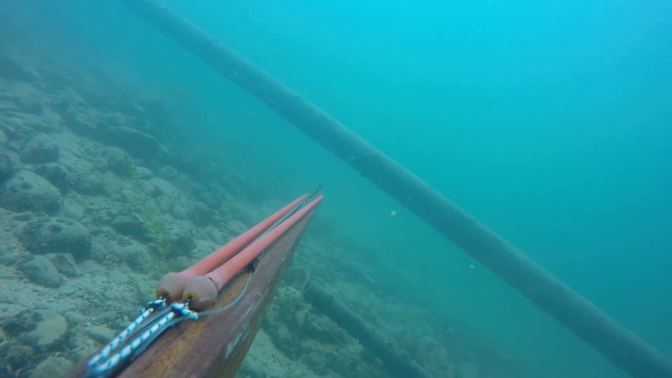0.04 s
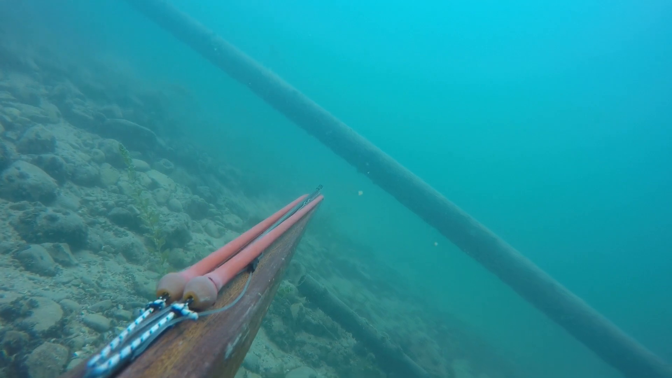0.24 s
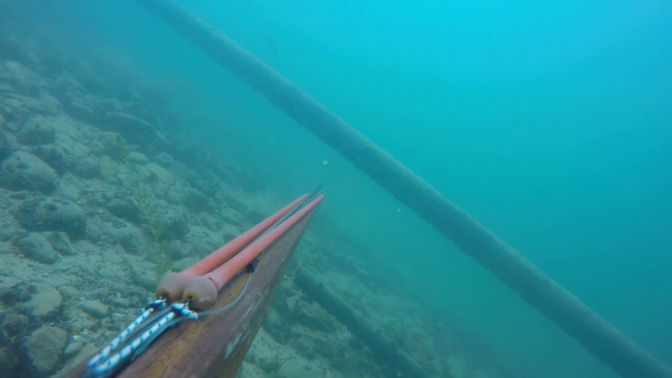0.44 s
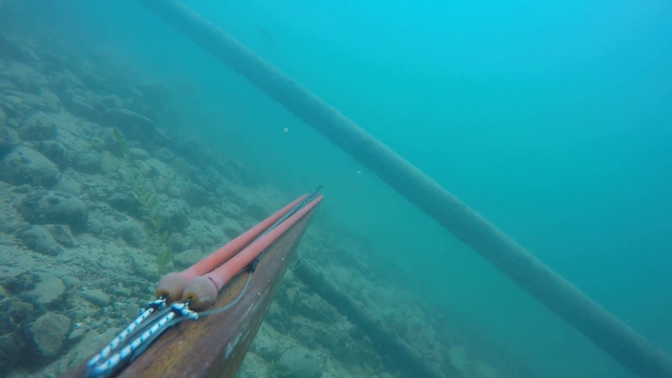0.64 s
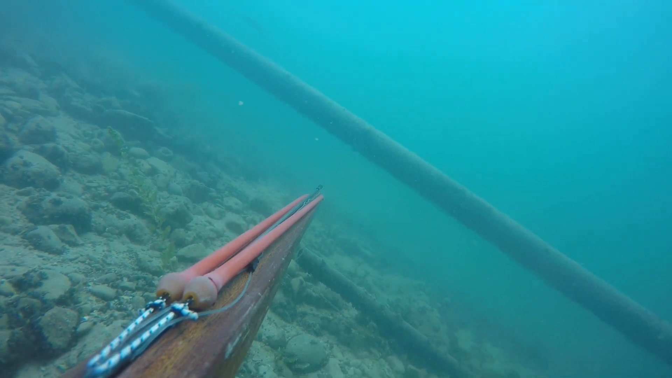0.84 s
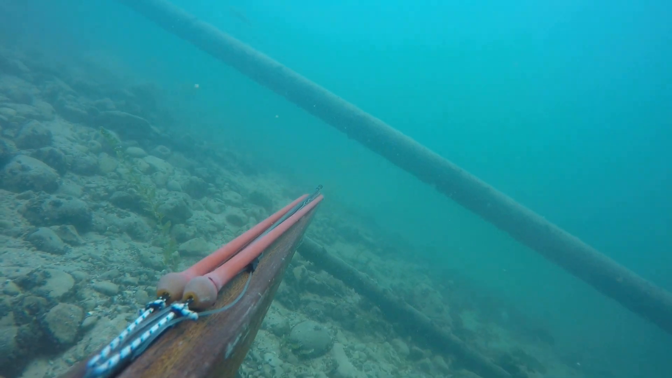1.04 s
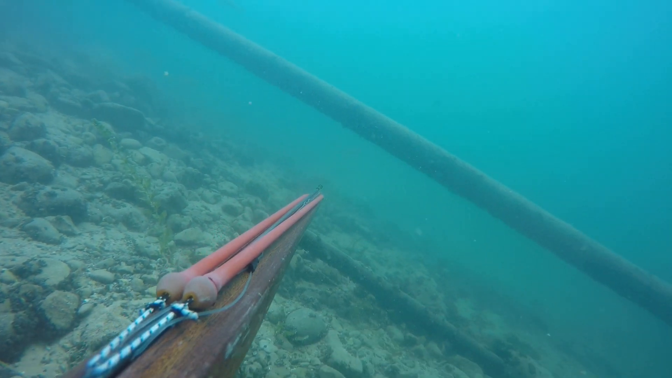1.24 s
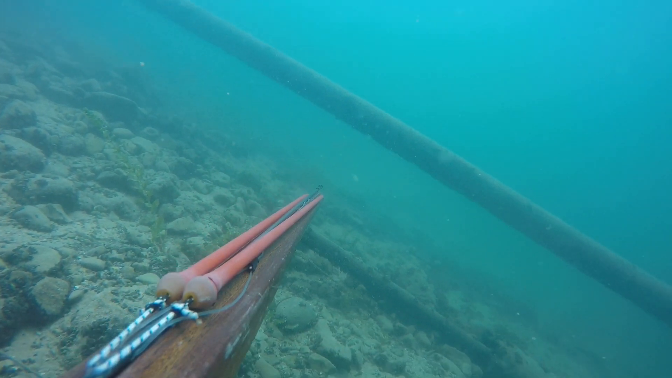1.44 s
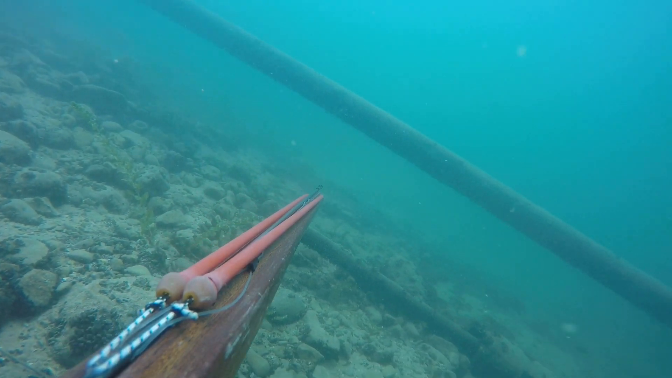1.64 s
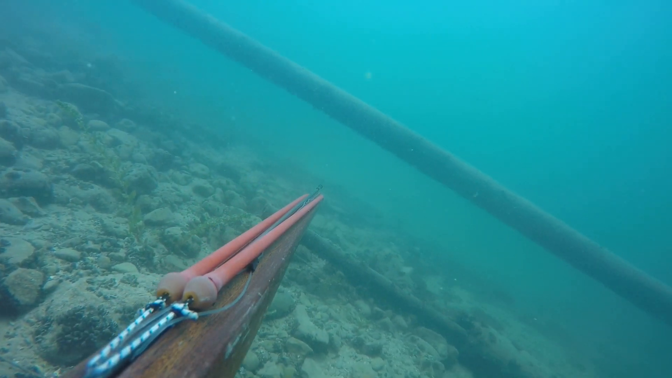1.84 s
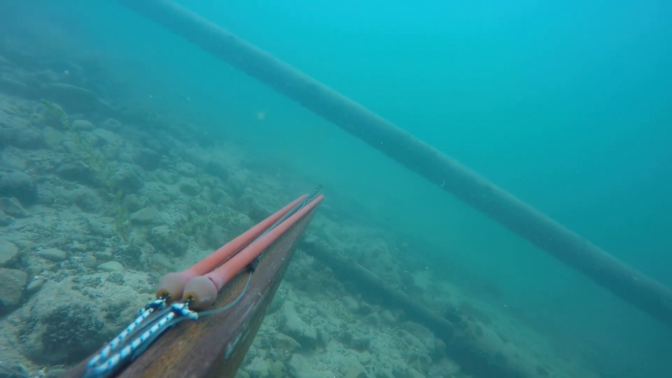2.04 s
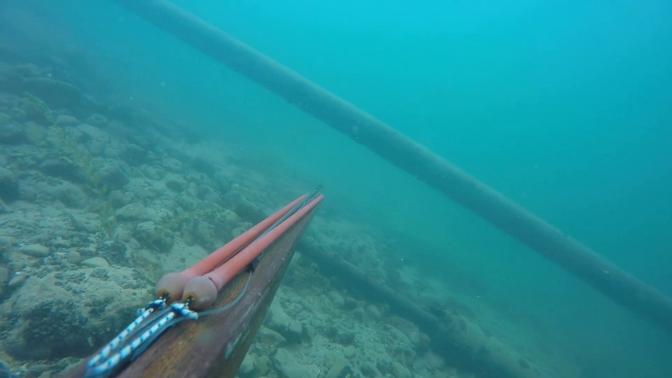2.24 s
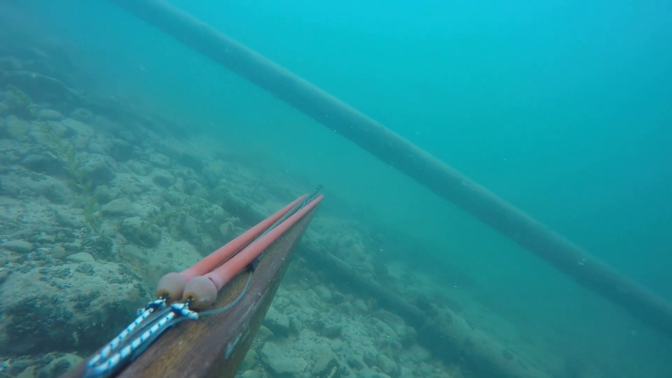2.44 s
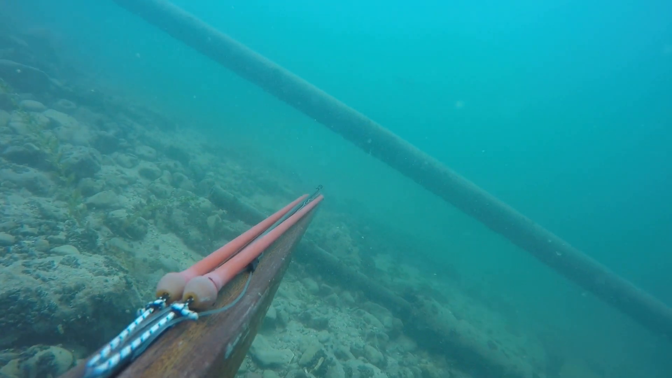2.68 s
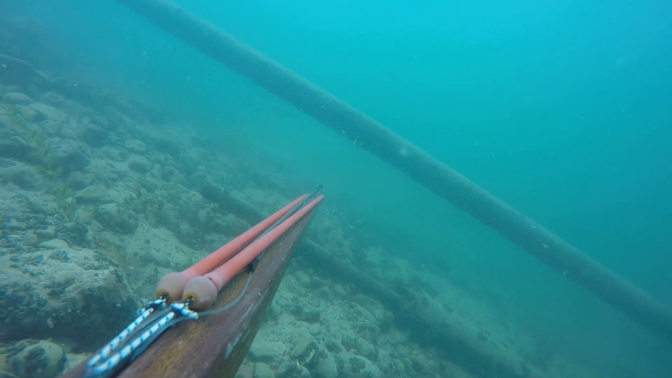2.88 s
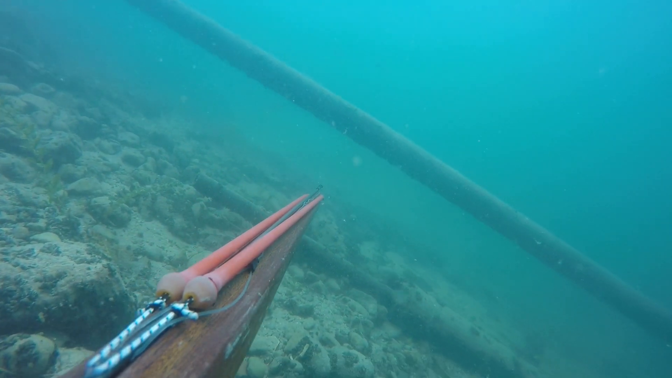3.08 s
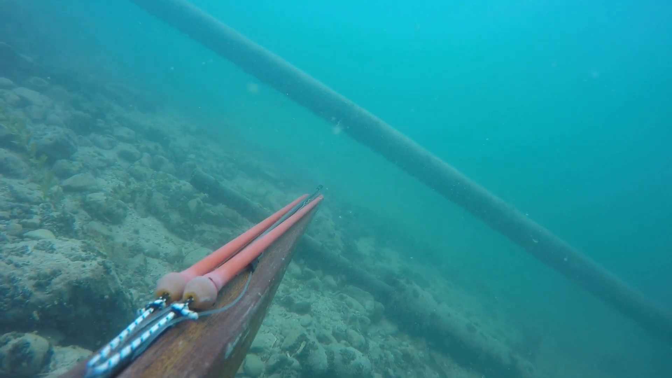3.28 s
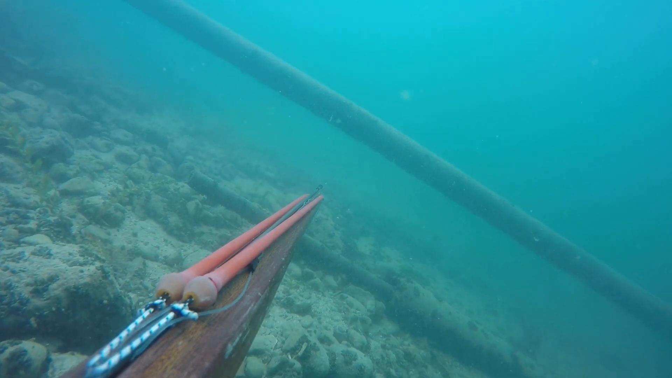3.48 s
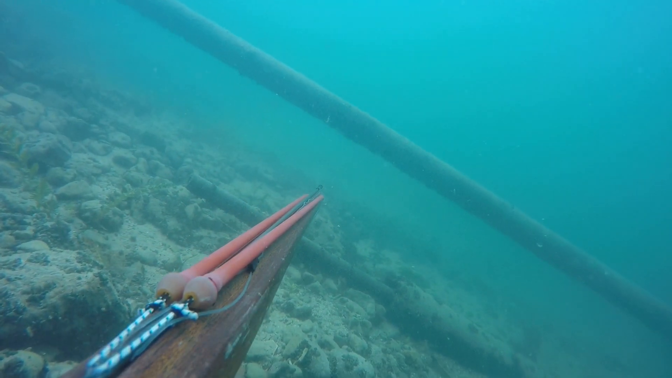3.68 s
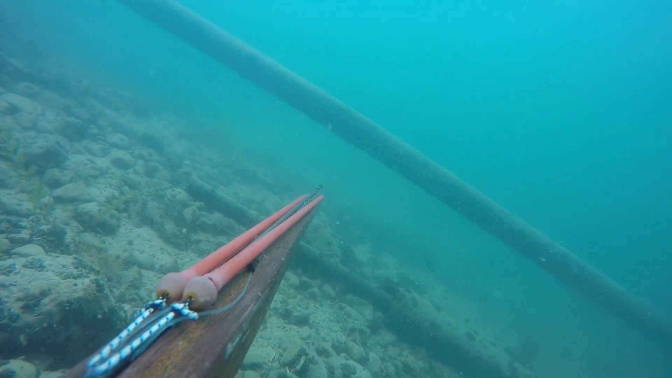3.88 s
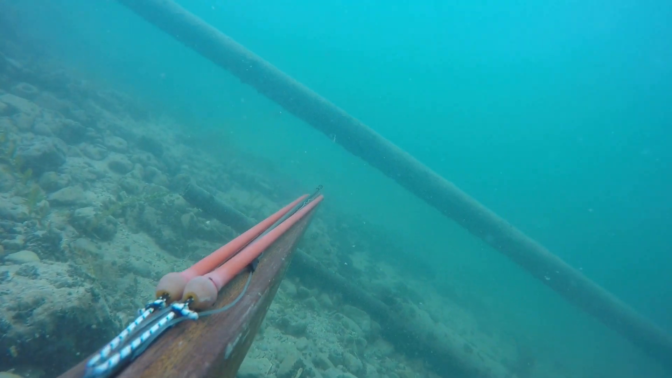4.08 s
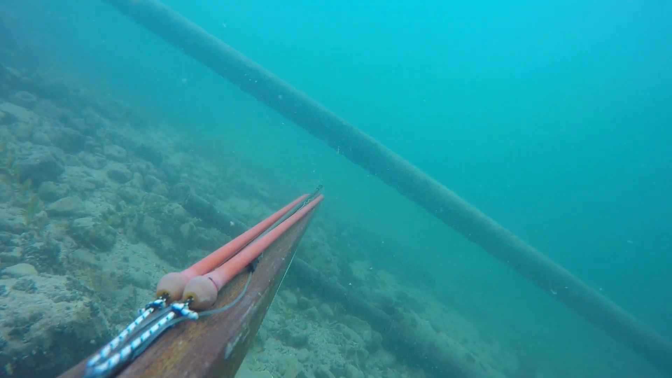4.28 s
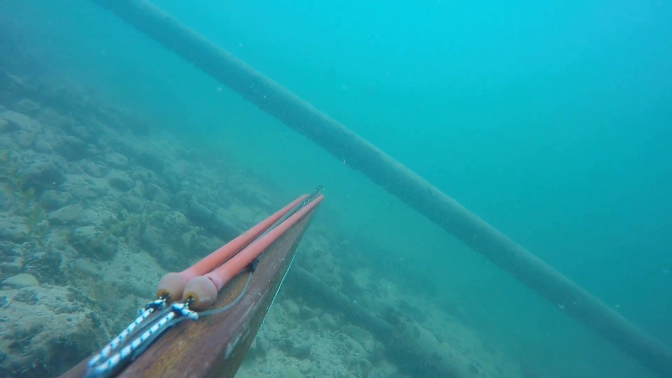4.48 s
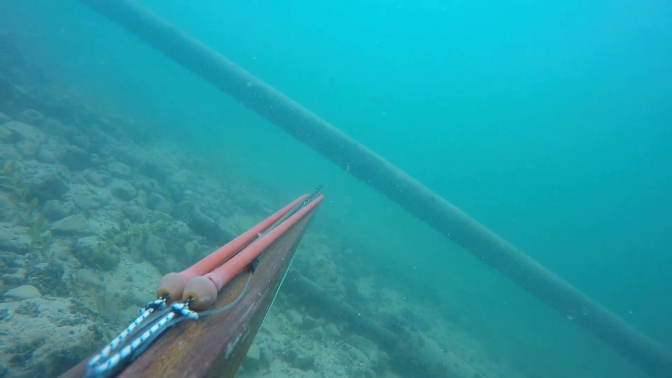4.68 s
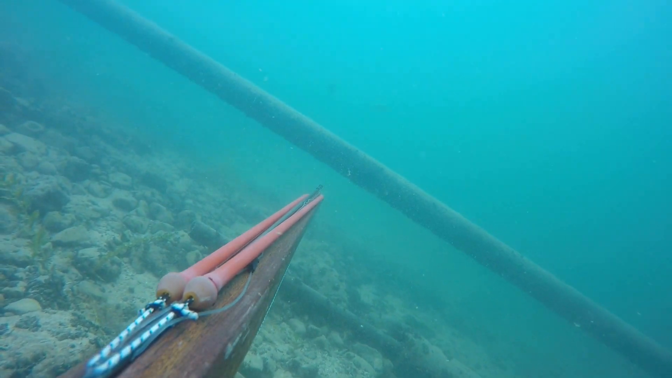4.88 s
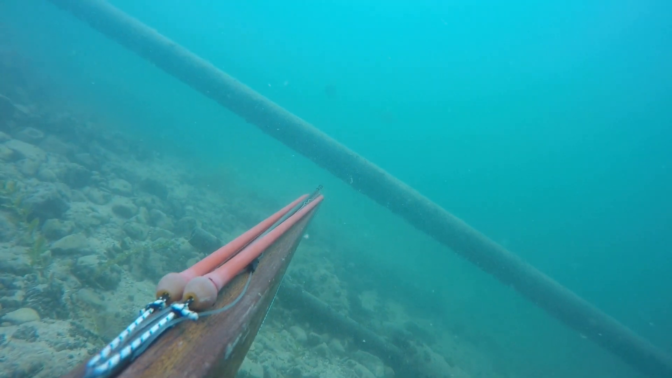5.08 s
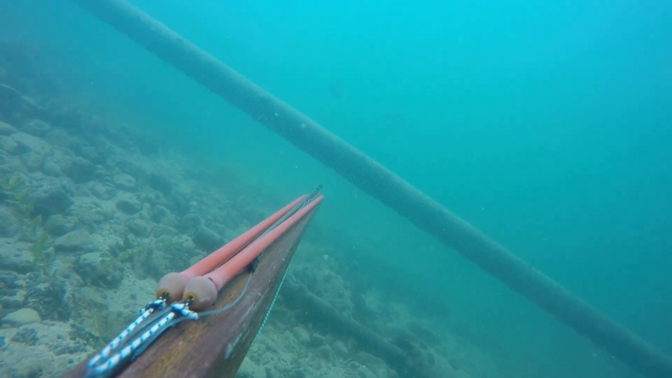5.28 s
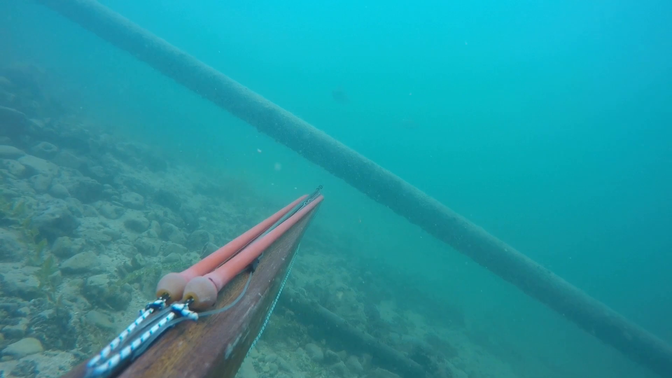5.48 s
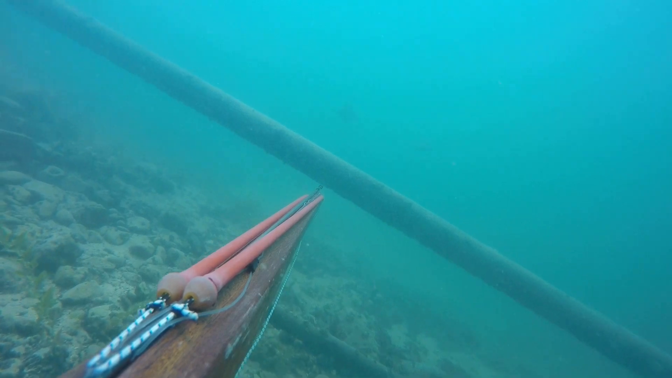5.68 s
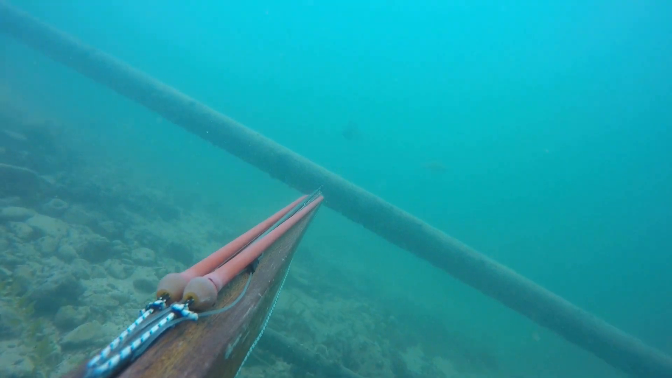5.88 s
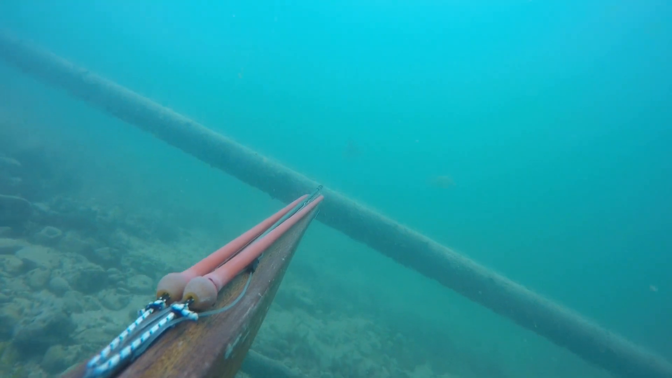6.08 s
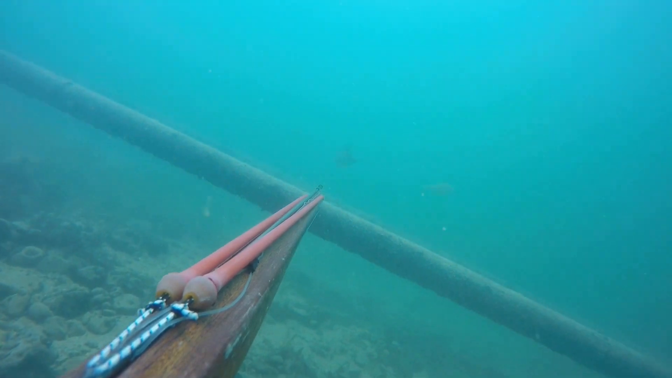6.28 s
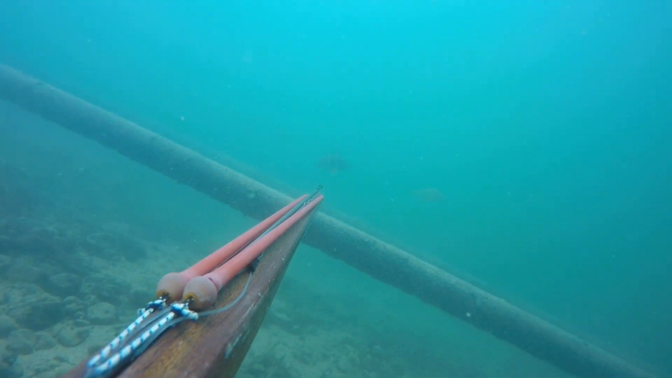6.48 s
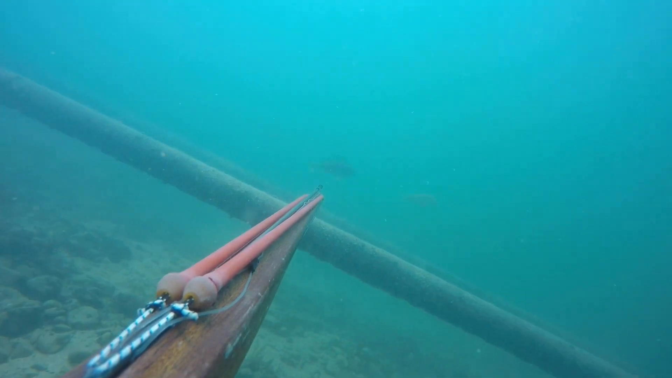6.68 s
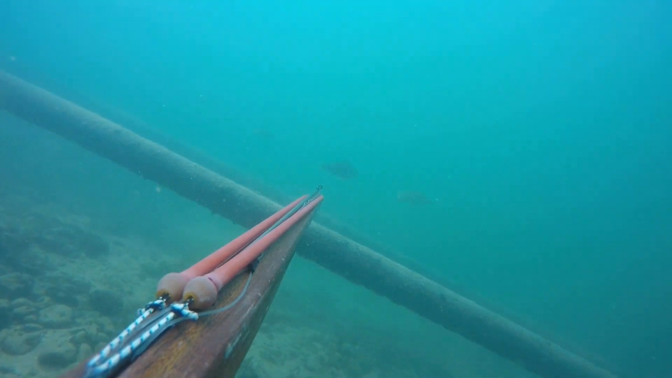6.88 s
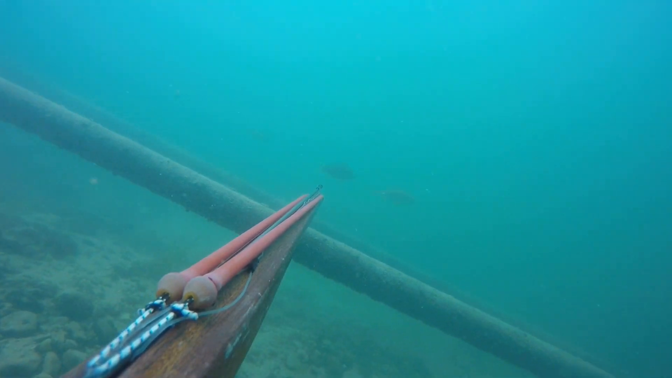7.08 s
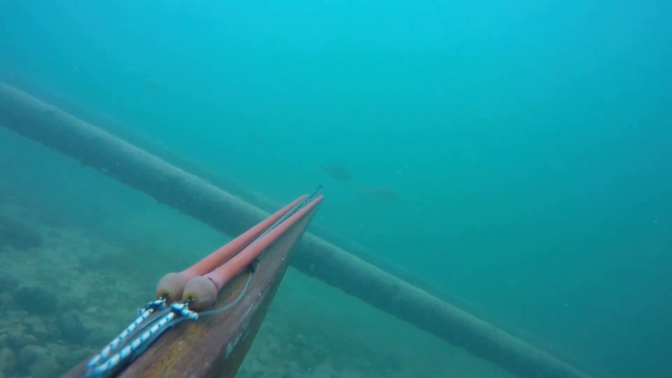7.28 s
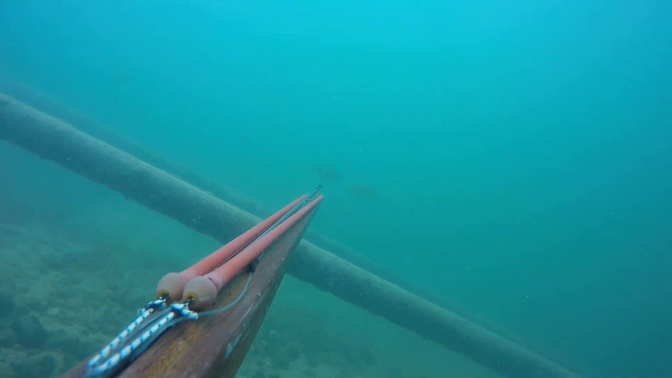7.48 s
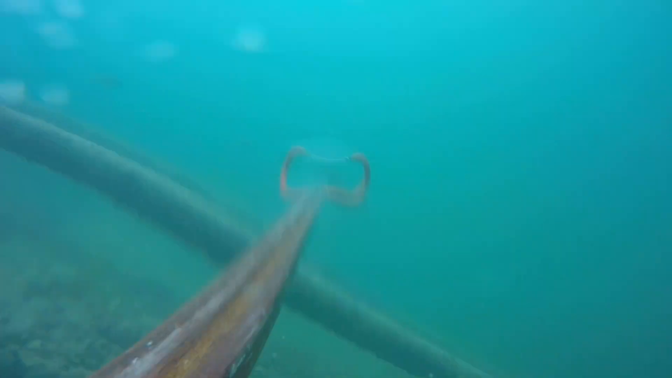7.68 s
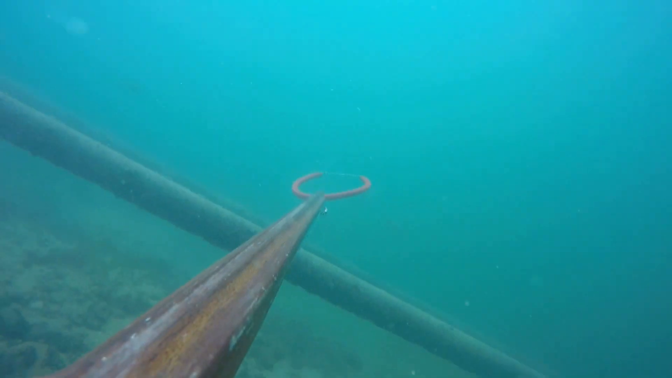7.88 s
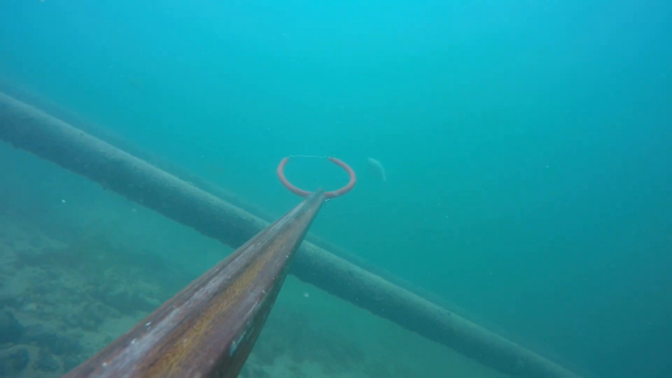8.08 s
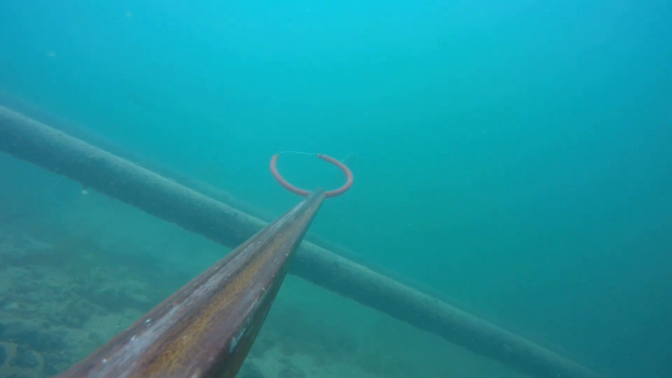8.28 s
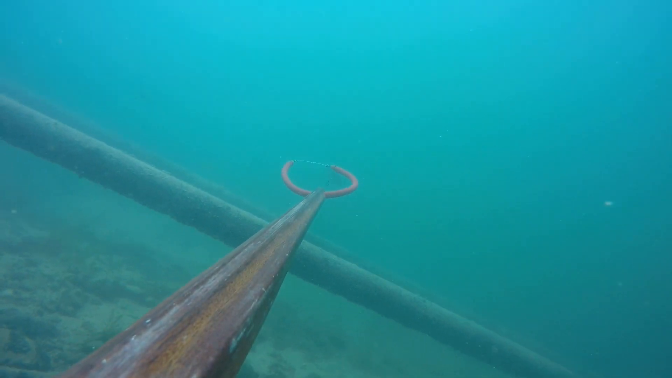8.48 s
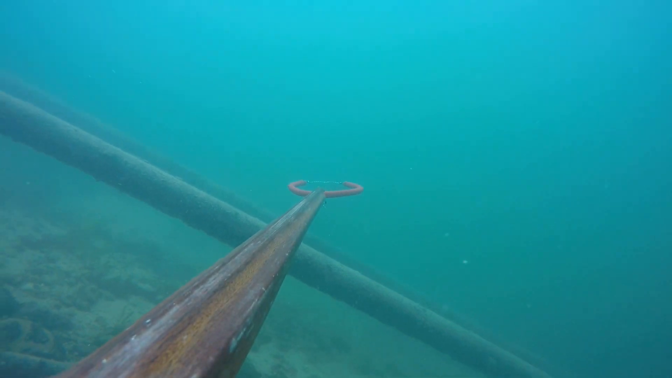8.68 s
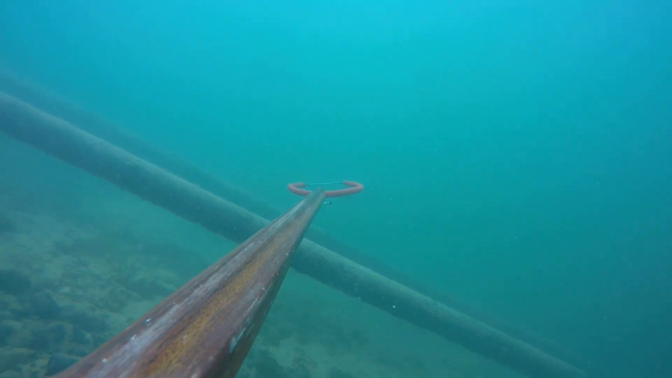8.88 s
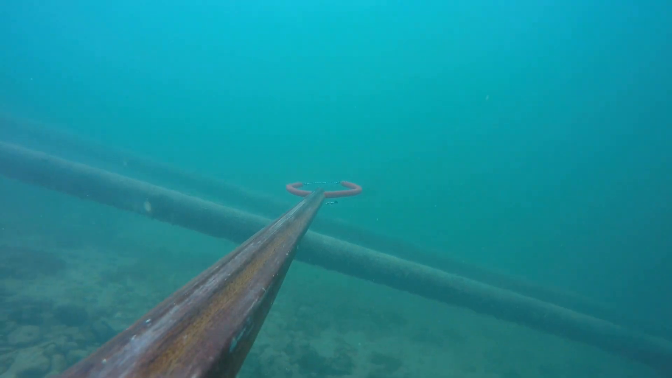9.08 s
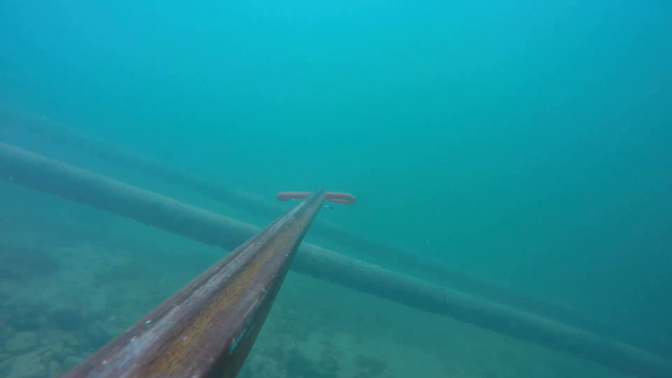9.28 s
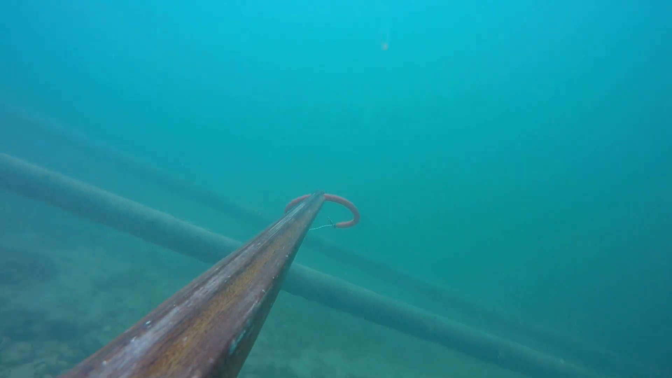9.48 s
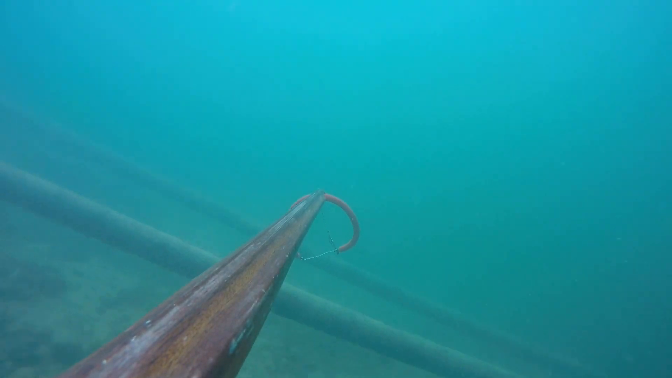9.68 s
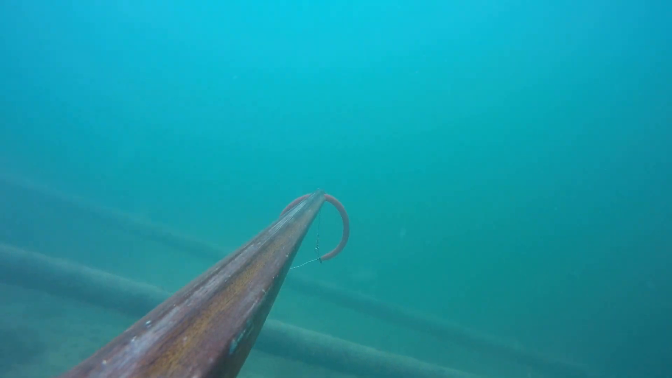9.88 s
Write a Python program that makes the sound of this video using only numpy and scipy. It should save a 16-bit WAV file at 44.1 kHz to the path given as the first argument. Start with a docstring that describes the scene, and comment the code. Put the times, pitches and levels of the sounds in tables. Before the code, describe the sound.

Quiet washing water with a thin faint whine, a sudden overloaded speargun shot, a brief hush, then irregular rubbery knocks and scrapes.

```python
"""A band-powered speargun is carried through a lake and fired, heard from a watertight housing fixed to its stock.
Water wash, a muffled hiss with narrow resonances and a thin whine lie over the mount's very low sway; dull bumps,
stirred water and a few high squeaks come before the shot. The shot, bursts of force into steel and barrel modes plus
a kick, overloads the microphone; the shaft scrapes off its rail, damped sines ring hollow, a faint high hiss holds
and fades, and the background sinks and creeps back. Line and slack bands then rub and knock in irregular stick-slip
bursts, and late on the line drags."""
import sys
import numpy as np
from scipy import signal
from scipy.fft import rfft, irfft, next_fast_len
from scipy.io import wavfile

SR = 44100
rng = np.random.default_rng(int(sys.argv[2]) if len(sys.argv) > 2 else 0)


def bounce(signal):
    """Save signal as a 16-bit WAV file at the path given by the first command-line argument."""
    frames = np.transpose(np.atleast_2d(signal))
    limited = np.clip(frames, -1, 1)
    pcm = np.round(limited * 32767).astype(np.int16)
    wavfile.write(sys.argv[1], SR, pcm)


N = 438354

# wash along the housing: (time [s], level [dB])
FLOW = [(0.0, -53), (0.38, -54), (2.23, -54.5), (7.5, -47)]
# relative noise spectra, each scaled to rms 1 in use: (frequency [Hz], density [dB per Hz])
WASH_SPECTRUM = [(100, -46), (170, -17.5), (210, -12.5), (306, -8), (386, -10), (437, -10), (642, 1),
                 (883, -9), (1110, -22), (1340, -20), (1530, -21.5), (1700, -14), (2210, -47), (3740, -120)]
GURGLE_SPECTRUM = [(35, -7.5), (55, 2), (75, -1.5), (100, -7.5), (135, -1.5), (155, -4.5), (185, -29),
                   (300, -32.5)]
HISS_SPECTRUM = [(820, -38), (1400, -20.5), (1550, -34), (1850, 2), (2500, 0), (3050, 0.5), (3400, -3.5),
                 (3690, -2), (4450, -8), (6070, -10), (6640, -16), (7340, -15), (8520, -19.5),
                 (13900, -25.5), (15200, -38)]
EDDY_SPECTRUM = [(20, -7), (35, 3), (50, -14), (70, -27.5), (110, -45.5), (200, -60)]
AFTER_HISS_SPECTRUM = [(4000, -0.5), (9000, -2.5), (15000, -9.5)]
# housing resonances singing in the hiss: (frequency [Hz], width [Hz], mean level [dB])
WHISTLES = [(443.7, 10, -70.5), (1943, 12, -71), (2325, 36, -65.5), (3043, 73, -63.5), (4093, 88, -71),
            (6000, 180, -80.5), (6140, 50, -78.5), (13700, 900, -81)]
HISS_SLOW_WATER_DB, HISS_SHARE_OF_WASH_RISE = -54.5, 0.18
GURGLE_DB, WATER_LULL_SHARE = -56, 0.94   # the water sinks less deeply than the hiss
# background level after the shot: (start [s], fall [s], depth [dB], hold [s], recovery [dB per s])
LULL = (7.706, 0.18, 20.56, 0.49, 14)

# sway while aiming and after the shot: (time [s], level [dB])
AIM_SWAY = [(4.6, -35.5), (4.8, -41), (5.15, -18.5), (5.77, -22.5), (5.81, -29.5), (6.19, -19.5),
            (6.37, -28), (6.67, -15), (7.17, -16.5), (7.23, -26), (7.55, -18.5)]
AFTER_SWAY = [(7.9, -33.5), (8.43, -41.5), (8.92, -34.5), (8.96, -22), (9.55, -23), (9.73, -32),
              (9.94, -17)]
# small pushes while stalking: (time of top [s], half length to 1/e [s], level [dB])
NUDGES = [(1.45, 0.21, -37), (4.2, 0.079, -34.5)]
SWAY_MEAN_HZ, STALK_DB = 23.0, -42.5   # STALK_DB: sway while gliding along

# swells of the whine: (time of top [s], half length to 1/e [s], level [dB])
WHINE_SWELLS = [(1.196, 0.062, -60.5), (3.87, 0.053, -61), (5.696, 0.38, -69), (8.95, .5, -52)]
# whine overtones: (multiple of the whine's pitch [1], mean level [dB])
OVERTONES = [(1.5, -67), (2, -66), (3, -76), (4, -79)]
WHINE_MEAN_HZ, WHINE_MEAN_DB, WHINE_WANDER_DB = 1793, -69.5, 3

# dull bumps, gulps of water, thump of the shot: (time [s], frequency [Hz], level before envelope [dB])
BUMPS = [(.079, 430, -26.5), (.162, 450, -32), (.212, 242, -34), (.485, 100, -28), (.652, 34, -21),
         (5.181, 80, -17), (5.238, 230, -22.5), (7.605, 151.3, 7), (8.695, 340.5, -36), (8.969, 217, -26),
         (9.428, 59.5, -10), (9.742, 85, -12.5)]
# gun turned, stirring the water: (time of top [s], half length to 1/e [s], level [dB])
STIRS = [(.15, .35, -52), (5.2, 0.098, -45.5), (8.05, .15, -61), (9.58, 0.25, -42.5)]
# short high squeaks: (time [s], level before envelope [dB])
SQUEAKS = [(3.462, -58), (3.490, -52), (5.352, -50)]
# hollow rings after the shot (low gulps, a clack's ping, knocks on the stock):
# (time [s], frequency [Hz], level before envelope [dB])
HOLLOW_RINGS = [(7.648, 301, -18.5), (7.657, 236, -16), (7.7228, 2660, -10), (7.725, 570, -21),
                (7.730, 380, -29.5), (8.0155, 752, -21), (8.042, 785, -28), (8.071, 757, -32),
                (8.117, 757, -35)]
BUMP_CYCLES, SQUEAK_CYCLES, RING_CYCLES = 5.4, 290, 26.8   # swings to decay 60 dB
SQUEAK_HZ = 11150

# steel on steel, trigger to the shaft's last clack:
# (time [s], length [s], steel ring [dB], crack [dB], crack top [Hz], barrel [dB])
SHOT_CONTACTS = [(7.581, 0.0043, -34, -62, 1520, -32), (7.602, 0.0026, -33, -33, 3000, -19.5),
                 (7.6075, 0.0027, -4.5, -8, 3404, -7.5), (7.615, 0.00074, -7, -10, 5000, -23),
                 (7.636, 0.0052, -17, -24.5, 2500, -26.5), (7.664, 0.0041, -26, -39, 2500, -28.5),
                 (7.7115, .0021, -26, -37, 7000, -42), (7.724, 0.0012, -26, -27, 3000, -34),
                 (7.8276, 0.005, -29, -29.5, 4500, -43)]
# the shaft's steel ring, bare scrape and barrel drone: (level [dB], hold [s], fade [dB per s])
SLIDE_PARTS = [(-24, .02, 299), (-29, 0.014, 299), (-20, 0.034, 401)]
# modes: (frequency [Hz], relative level before chance [dB], t60 [s])
BARREL_MODES = [(320, -8, .04), (485.5, -1, .02), (672, 0, .022), (875, -5.5, 0.029), (1090, -15.5, 0.023),
                (1355, -2.5, .025), (1500, -10, 0.019)]
STEEL_MODES = [(1950, -1.5, 0.015), (2300, 1.5, 0.0098), (2490, 1, 0.0087), (3060, -4, 0.008),
               (3245, -3.5, 0.0088), (4100, -12, 0.015), (5030, -9.5, 0.0044), (6000, -7, 0.0064)]
STOCK_MODES = [(232, -14.5, 0.049), (328, -15.5, 0.04), (449, -12, 0.075), (644, 0.5, 0.035),
               (788, 0, 0.062), (1056, -15.5, 0.058)]
FITTING_MODES = [(1514, -3.5, 0.011), (1770, -6.5, 0.023), (2240, 2.5, 0.02), (2740, -7.5, 0.031),
                 (2840, -8.5, 0.019), (3270, -3, 0.0065), (3580, 7, 0.0098), (3950, 6.5, 0.0048),
                 (4544, -7, 0.015)]
FIRE_S, SLIDE_START_S = 7.602, 7.622
AFTER_HISS_DB, AFTER_HISS_HOLD_S, AFTER_HISS_FADE_DB_PER_S = -74.5, 0.59, 150

# line and bands rubbing and knocking: (time [s], length [s], fittings [dB], stock [dB])
RUBS = [(7.983, 0.015, -49.5, -46), (8.01, 0.0031, -31, -36), (8.045, 0.013, -57, -38),
        (8.068, 0.0057, -42.5, -37), (8.076, 0.019, -46, -38), (8.098, .026, -45.5, -41.5),
        (8.182, 0.012, -63, -59), (8.538, .008, -62.5, -58), (8.97, 0.0076, -62.5, -45),
        (9.22, 0.041, -43.5, -44), (9.3724, 0.0072, -23, -29), (9.408, 0.034, -32, -28.5),
        (9.450, 0.023, -33, -34), (9.497, 0.0016, -40, -36), (9.527, 0.0061, -24.5, -32.5),
        (9.557, .005, -32, -30.5), (9.595, .004, -31, -34), (9.611, 0.041, -36.5, -33.5),
        (9.651, 0.0056, -29.5, -30.5), (9.677, .003, -40, -34), (9.717, 0.022, -34, -34.5),
        (9.746, 0.033, -42.5, -34.5)]
JUDDER_MEDIAN_HZ, JUDDER_DB, RUB_FADE_DB = 104.8, 4.5, 3.5
# a harder contact favours the fittings over the stock
EQUAL_LEVELS_CONTACT_HZ, HARDER_DB_PER_OCTAVE = 4930, 7
DRAG_START_S, DRAG_LENGTH_S, DRAG_SLIPS_PER_S = 9.3, 0.64, 900
DRAG_FITTINGS_DB, DRAG_STOCK_DB = -52, -47

CUTOFF_HZ = 15400


def from_db(db):
    """Decibels to amplitude."""
    return 10 ** (np.asarray(db) / 20)


def rms_one(x):
    """Scale to rms 1."""
    return x / np.sqrt(np.mean(x ** 2) + 1e-20)


def in_time(rows):
    """Each column of a time curve, interpolated at every sample."""
    s, *columns = np.transpose(rows)
    return [np.interp(np.arange(N) / SR, s, c) for c in columns]


def add(out, start_s, sound):
    """Mix a sound in from start_s."""
    start = int(start_s * SR)
    out[start:start + len(sound)] += sound[:N - start]


def coloured(spectrum):
    """Noise with the given spectrum, falling steeply beyond its ends; rms 1."""
    hz, db = np.transpose(spectrum)
    size = next_fast_len(N)
    f = np.maximum(np.fft.rfftfreq(size, 1 / SR), 1)
    skirts = np.minimum(1, np.minimum(f / hz[0], hz[-1] / f)) ** 6
    gain = from_db(np.interp(np.log(f), np.log(hz), db)) * skirts
    return rms_one(irfft(rfft(rng.standard_normal(size)) * gain, size)[:N])


def drift(rate_hz):
    """Slow random wander with rms 1: noise through two equal poles, computed every 40 samples."""
    r = np.exp(-80 * np.pi * rate_hz / SR)
    noise = rng.standard_normal(N // 40 + 2002)
    slow = signal.lfilter([1], [1, -2 * r, r * r], noise)[2000:]   # drop the filter's start-up
    return np.interp(np.arange(N) / 40, np.arange(len(slow)), rms_one(slow))


def swells(rows):
    """Summed amplitude of smooth rises and falls."""
    t = np.arange(N) / SR
    return sum(from_db(db) * np.exp(-((t - s) / half_s) ** 2) for s, half_s, db in rows)


def muffle(x, hz, order=1):
    """Low-pass."""
    return signal.sosfilt(signal.butter(order, min(hz, SR / 2 - 1), fs=SR, output="sos"), x)


def ring(force, hz, t60_s):
    """One damped mode; a unit click sets it ringing at height 1."""
    r, w = from_db(-60 / (t60_s * SR)), 2 * np.pi * hz / SR
    return signal.lfilter([.5, 0, -.5], [1, -2 * r * np.cos(w), r * r], force + 1e-18)


def body(force, modes, vary_db):
    """All modes of an object under one force; each point of contact favours other modes."""
    chance = rng.standard_normal(len(modes))
    out = 0
    for k, (hz, db, t60_s) in enumerate(modes):
        out = out + (-1) ** k * from_db(db + vary_db * chance[k]) * ring(force, hz, t60_s)
    return out


def slips(length_s, per_s, spread_db):
    """A contact catches once, then sticks and slips at random for its length."""
    size = SR // 4
    slipping = (rng.random(size) < per_s / SR) * (np.arange(size) < length_s * SR)
    strength = from_db(spread_db * rng.standard_normal(size))
    force = slipping * strength * rng.choice([-1, 1], size)
    force[0] = 1
    return force


def at_level(sound, db, length_s):
    """Give a burst the energy of that level held for that time."""
    return sound * from_db(db) * np.sqrt(length_s * SR / np.sum(sound ** 2))


def echoes(x, share, count=8):
    """Faint echoes from stock, bottom and surface ripple the spectrum."""
    out = x.copy()
    lags = rng.integers(SR // 400, SR // 30, count)
    for lag, sign in zip(lags, rng.choice([-1, 1], count)):
        out[lag:] += sign * share * x[:-lag]
    return out / np.sqrt(1 + count * share ** 2)


def lull_db():
    """Background gain in dB: a quick fall, a hold, a slow steady climb."""
    start_s, fall_s, depth_db, hold_s, db_per_s = LULL
    t = np.arange(N) / SR - start_s
    return -depth_db * np.clip(t / fall_s, 0, 1) + db_per_s * np.maximum(t - fall_s - hold_s, 0)


def background():
    """Water washes past the housing, whose narrow resonances colour a steady hiss."""
    wash_db, = in_time(FLOW)
    wash = from_db(wash_db + 1.0 * drift(15)) * coloured(WASH_SPECTRUM)
    gurgle = from_db(GURGLE_DB + 1.5 * drift(7)) * coloured(GURGLE_SPECTRUM)
    hiss_db = HISS_SLOW_WATER_DB + HISS_SHARE_OF_WASH_RISE * (wash_db - wash_db[0])
    hiss = from_db(hiss_db + 0.26 * drift(8.1)) * coloured(HISS_SPECTRUM)
    for hz, width_hz, db in WHISTLES:
        t60_s = np.log(1000) / (np.pi * width_hz)
        whistle = rms_one(ring(rng.standard_normal(N), hz, t60_s))
        hiss += from_db(db + 2.2 * drift(0.56)) * whistle
    gain_db = lull_db()
    return echoes(from_db(WATER_LULL_SHARE * gain_db) * (wash + gurgle) + from_db(gain_db) * hiss, share=.09)


def sway(beat_db=1.5):
    """The mount swings at its own wandering pitch, with eddy noise in step with its level."""
    stalk = [(0, STALK_DB), (AIM_SWAY[0][0] - .1, STALK_DB)]
    level_db, = in_time(stalk + list(AIM_SWAY) + list(AFTER_SWAY))
    turns = np.cumsum(SWAY_MEAN_HZ * (1 + 0.0727 * drift(5))) / SR
    swing = np.sqrt(2) * np.sin(2 * np.pi * turns)
    eddies = from_db(-14.0) * coloured(EDDY_SPECTRUM)
    level = (from_db(level_db) + swells(NUDGES)) * from_db(beat_db * drift(11))
    return level * (swing + eddies)


def whine():
    """A thin, unsteady tone whose overtones vary in level on their own; it sinks with the hiss."""
    level = from_db(WHINE_MEAN_DB + WHINE_WANDER_DB * drift(2.5)) + swells(WHINE_SWELLS)
    phase = 2 * np.pi * np.cumsum(WHINE_MEAN_HZ + 6.1 * drift(35) + 2 * drift(0.94)) / SR
    tone = level * from_db(2.6 * drift(7.3)) * np.sin(phase)
    for multiple, db in OVERTONES:
        tone += from_db(db + 3.5 * drift(8.3)) * np.sin(multiple * phase)
    return np.sqrt(2) * from_db(lull_db()) * tone


def pops(rows, cycles, soft_cycles):
    """Each is one damped swing that dies in so many cycles, its onset rounded over soft_cycles."""
    out, t = np.zeros(N), np.arange(SR // 4) / SR
    for s, hz, db in rows:
        envelope = np.exp(-np.log(1000) * t * hz / cycles) * (1 - np.exp(-t * hz / soft_cycles))
        add(out, s, from_db(db) * envelope * np.sin(2 * np.pi * hz * t))
    return out


def bumps():
    """Dull bumps and gulps, and the shot's thump: low swings that die within a few cycles."""
    return pops(BUMPS, BUMP_CYCLES, soft_cycles=0.44)


def stir():
    """Turning the gun stirs the water into a low, lumpy gurgle."""
    return swells(STIRS) * from_db(2.7 * drift(20)) * coloured(GURGLE_SPECTRUM)


def squeaks():
    """Short high tones with a soft onset and a ringing decay."""
    rows = [(s, SQUEAK_HZ, db) for s, db in SQUEAKS]
    return pops(rows, SQUEAK_CYCLES, soft_cycles=2.4)


def shot():
    """Steel snaps free and strikes steel: a broad crack, the shaft's ring and the barrel's thud."""
    out = np.zeros(N)
    for s, length_s, steel_db, crack_db, top_hz, barrel_db in SHOT_CONTACTS:
        force = slips(length_s, per_s=16000, spread_db=6)
        contact = muffle(force, hz=top_hz)
        crack = muffle(contact - muffle(contact, hz=694), hz=10300, order=2)
        steel = body(contact, STEEL_MODES, vary_db=2.5)
        barrel = body(force, BARREL_MODES, vary_db=4.5)
        add(out, s, at_level(crack, crack_db, length_s))
        add(out, s, at_level(steel, steel_db, length_s))
        add(out, s, at_level(barrel, barrel_db, length_s + .003))
    return out


def recoil(kick_db=4.0, t60_s=0.56, swing_hz=22, jerk_hz=58, jerk_s=.0047, rise_s=0.0057):
    """The kick throws the mount forward fast; its pitch drops to swing_hz as it swings out."""
    t = np.maximum(np.arange(N) / SR - FIRE_S, 0)
    turns = swing_hz * t + jerk_hz * jerk_s * (1 - np.exp(-t / jerk_s))
    envelope = (1 - np.exp(-(t / rise_s) ** 2)) * np.exp(-np.log(1000) * t / t60_s)
    return from_db(kick_db) * envelope * np.sin(2 * np.pi * turns)


def after_hiss():
    """A faint steady high hiss after the shot: coloured noise that holds, then fades."""
    t = np.arange(N) / SR - FIRE_S
    level_db = AFTER_HISS_DB - AFTER_HISS_FADE_DB_PER_S * np.maximum(t - AFTER_HISS_HOLD_S, 0)
    return (t > 0) * from_db(level_db + 1.5 * drift(40)) * coloured(AFTER_HISS_SPECTRUM)


def slide(chatter_db=6.5):
    """The shaft scrapes along its rail, chattering; each part holds, then fades at its own rate."""
    out, t = np.zeros(N), np.arange(SR // 4) / SR
    chatter = from_db(chatter_db * drift(140)[:len(t)])
    force = slips(t[-1], per_s=9000, spread_db=4.5) * chatter
    contact = muffle(force, hz=2980)
    steel = body(contact, STEEL_MODES, vary_db=2.5)
    scrape = muffle(contact - muffle(contact, hz=694), hz=10400, order=2)
    drone = body(force, BARREL_MODES, vary_db=2.5)
    for part, (db, hold_s, db_per_s) in zip((steel, scrape, drone), SLIDE_PARTS):
        fade_db = db_per_s * np.maximum(t - hold_s, 0)
        add(out, SLIDE_START_S, rms_one(part) * from_db(db - fade_db))
    return out


def hollow_rings():
    """Low gulps, a clack's ping and knocks on the stock ring after the shot as damped sines."""
    return pops(HOLLOW_RINGS, RING_CYCLES, soft_cycles=0.81)


def rubs():
    """Line and rubber catch, let go and ease off: fittings buzz, the stock rings a little longer."""
    out, t = np.zeros(N), np.arange(SR // 4) / SR
    for s, length_s, fittings_db, stock_db in RUBS:
        judder_hz = JUDDER_MEDIAN_HZ * np.exp(0.25 * rng.standard_normal())
        judder_db = JUDDER_DB * np.cos(2 * np.pi * judder_hz * t)
        fade_db = RUB_FADE_DB * np.minimum(t / length_s, 1)
        force = slips(length_s, per_s=2300, spread_db=5.5) * from_db(judder_db - fade_db)
        octaves_harder = (fittings_db - stock_db) / HARDER_DB_PER_OCTAVE
        # soft rubber hardly reaches the upper modes
        contact = muffle(force, hz=EQUAL_LEVELS_CONTACT_HZ * 2 ** octaves_harder, order=2)
        buzz = muffle(body(contact, FITTING_MODES, vary_db=3.0), hz=4940, order=4)
        bare = muffle(force, hz=4400, order=2)
        stock = muffle(body(force, STOCK_MODES, vary_db=2.0), hz=1293, order=2)
        add(out, s, at_level(buzz, fittings_db, length_s))
        add(out, s, at_level(bare, fittings_db - 25, length_s))
        add(out, s, at_level(stock, stock_db, length_s + 0.0021))
    return out


def drag():
    """Between the knocks the line drags lightly over the stock: sparse slips excite both bodies."""
    progress = np.clip((np.arange(N) / SR - DRAG_START_S) / DRAG_LENGTH_S, 0, 1)
    envelope = np.sin(np.pi * progress)
    slipping = rng.random(N) < DRAG_SLIPS_PER_S / SR
    force = slipping * rng.standard_normal(N) * from_db(4.7 * drift(29))
    buzz = rms_one(muffle(body(force, FITTING_MODES, vary_db=1.0), hz=4860, order=4))
    stock = rms_one(muffle(body(force, STOCK_MODES, vary_db=6.0), hz=1293, order=2))
    return envelope * (from_db(DRAG_FITTINGS_DB) * buzz + from_db(DRAG_STOCK_DB) * stock)


def scene():
    """The water, the gun, the hollow rings and the faint hiss, whine and squeaks; one channel."""
    water = background() + bumps() + stir()
    gun = sway() + shot() + recoil() + slide() + rubs() + drag()
    return (water + gun + hollow_rings() + after_hiss() + whine() + squeaks())[None]


def record(dry):
    """The shot flattens against the microphone's limit; a steep low-pass cuts the top."""
    clipped = dry / (1 + (dry / .96) ** 8) ** (1 / 8)
    return signal.sosfilt(signal.ellip(10, .1, 80, CUTOFF_HZ, fs=SR, output="sos"), clipped)


dry = scene()
out = record(dry)
bounce(out)
```